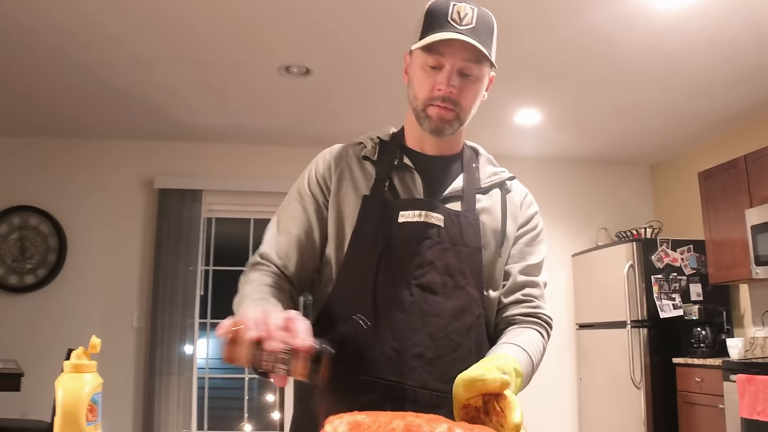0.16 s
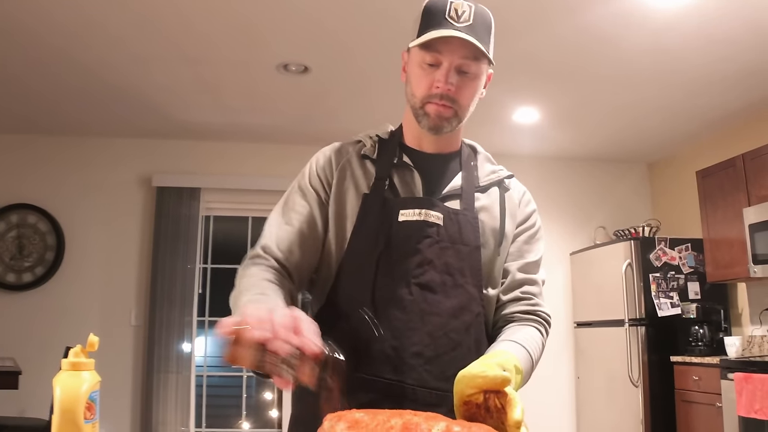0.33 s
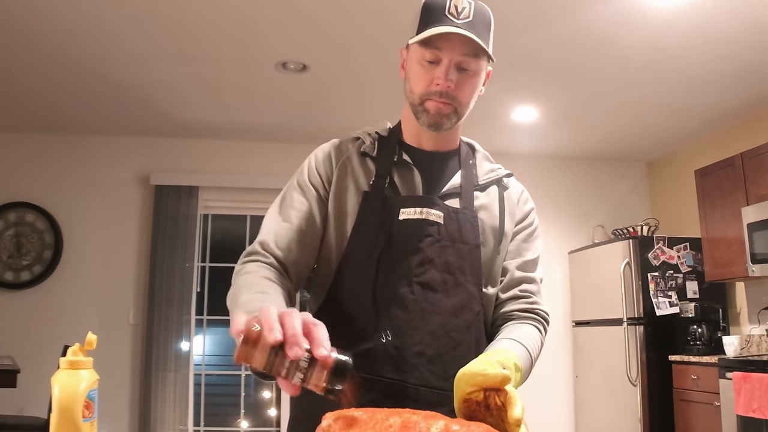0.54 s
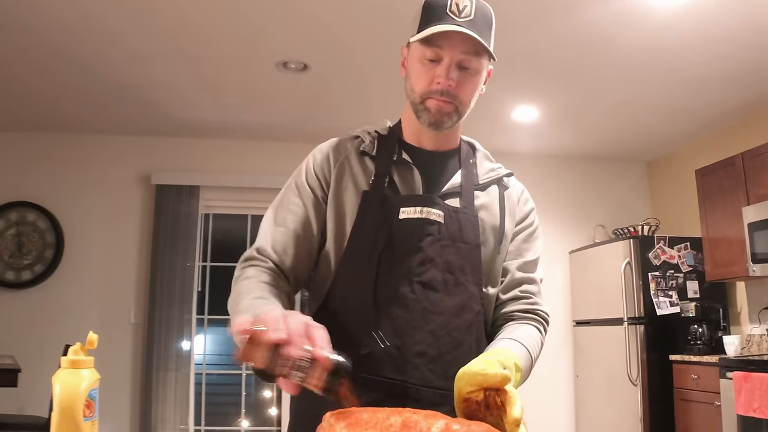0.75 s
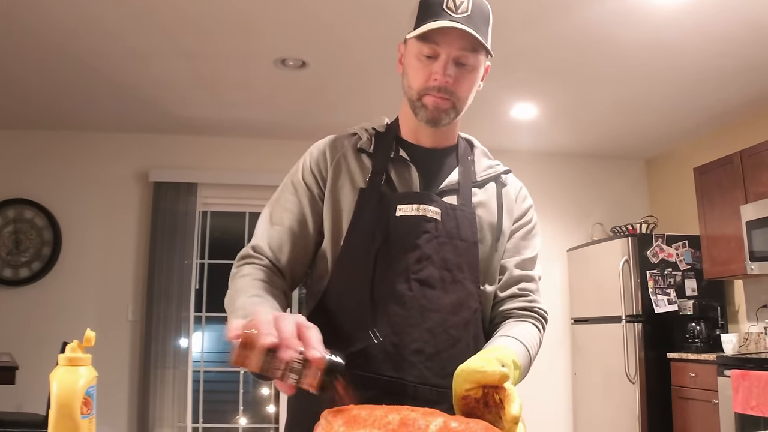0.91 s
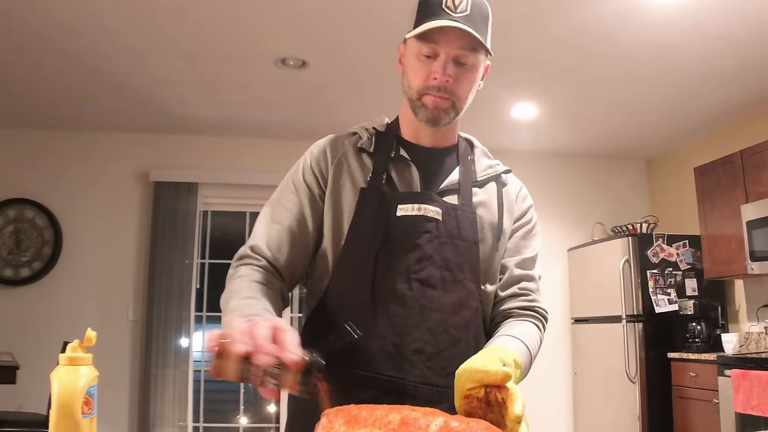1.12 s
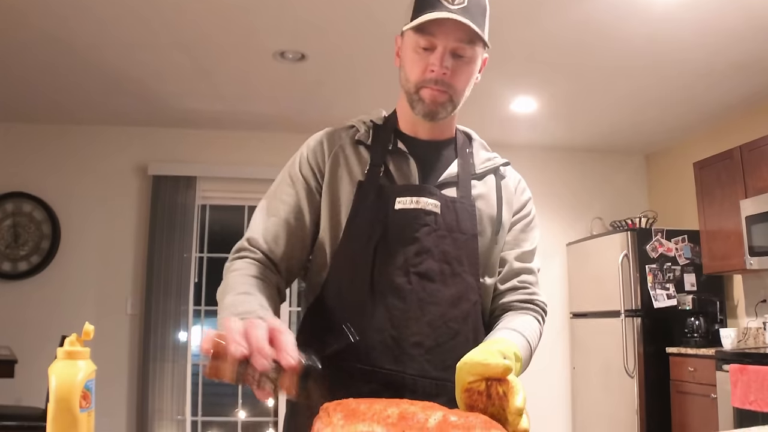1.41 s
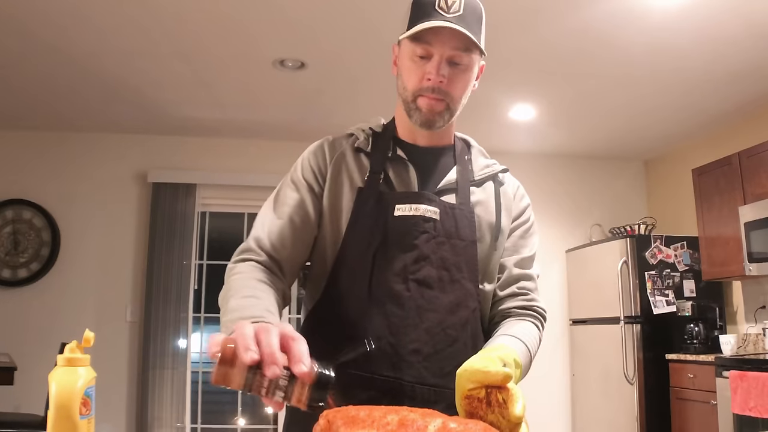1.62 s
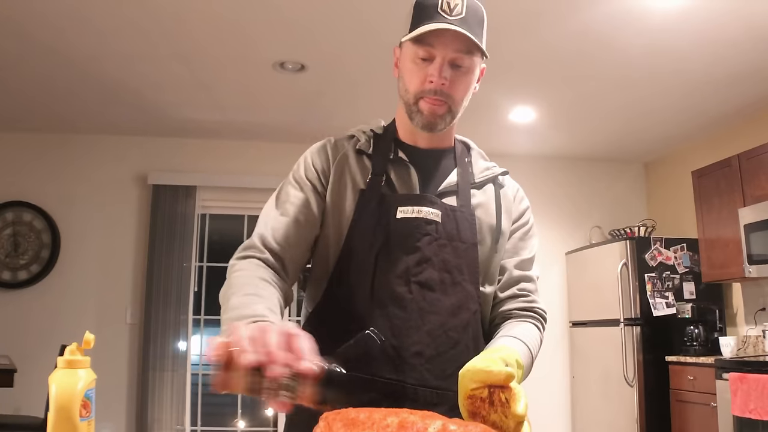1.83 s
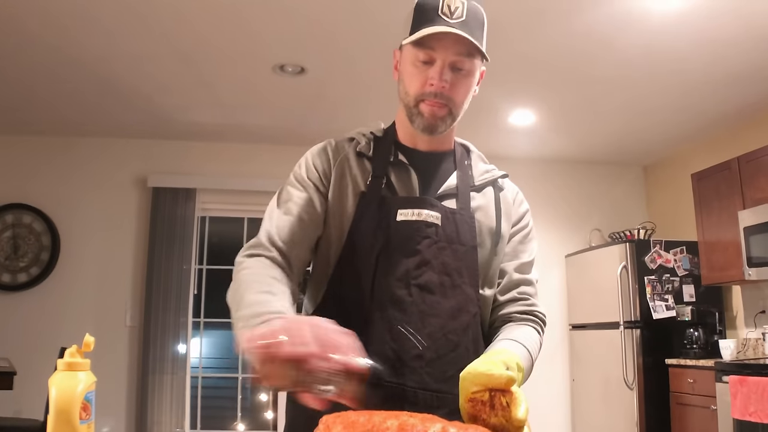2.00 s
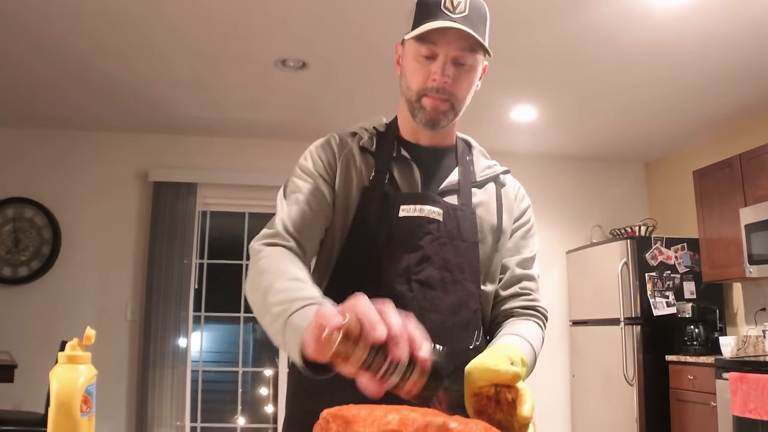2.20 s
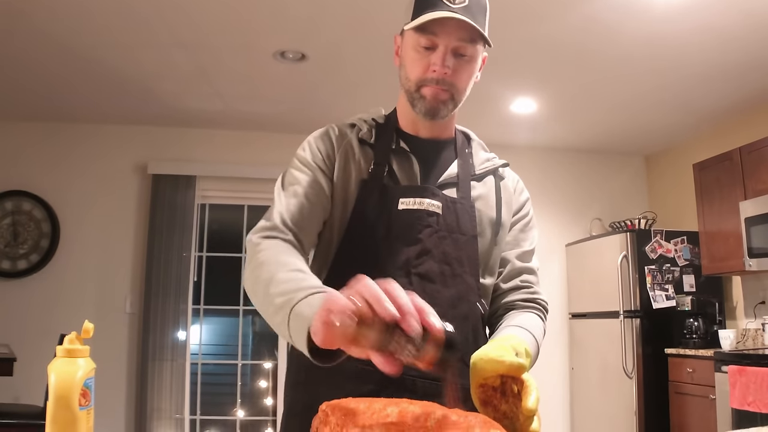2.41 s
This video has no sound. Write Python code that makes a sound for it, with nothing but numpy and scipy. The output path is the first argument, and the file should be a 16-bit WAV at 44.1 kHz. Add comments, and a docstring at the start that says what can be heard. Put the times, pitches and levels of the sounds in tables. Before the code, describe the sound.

A plastic bottle of dry seasoning is shaken quickly and steadily, each shake a short grainy hiss with small ticks and rattles, over fine patter on meat, close to the microphone in a quiet kitchen.

```python
"""A plastic bottle of dry seasoning is shaken fast over meat in a quiet kitchen.
At each turn the grains slide and strike the wall: thousands of tiny clicks ring short resonators.
Clumps tick (noise bursts) and rattle (wall modes), the load thuds softly, a fine patter falls throughout.
Below: faint room noise, appliance hum, a faint tone that comes and goes, dull bumps through the counter,
and a very deep rumble of the shaking carried to the microphone, made of shaped noise."""
import sys
import numpy as np
from scipy import signal
from scipy.fft import rfft, irfft
from scipy.io import wavfile

SR = 44100
rng = np.random.default_rng(int(sys.argv[2]) if len(sys.argv) > 2 else 0)


def store_wav(level_fs):
    """Save 16-bit WAV to argv[1]."""
    pcm = np.round(np.clip(np.atleast_2d(level_fs), -1, 1) * 32767)
    wavfile.write(sys.argv[1], SR, pcm.T.astype(np.int16))


N = 112454


def amp(db):
    """Turn decibels into a plain factor."""
    return 10 ** (np.asarray(db) / 20)


def rms_one(x):
    """Scale a sound to an rms (average strength) of 1."""
    return x / np.sqrt(np.mean(x ** 2) + 1e-30)


def in_time(rows):
    """Draw straight lines between (time, level) points, one value per sample."""
    times, levels = np.transpose(rows)
    return np.interp(np.arange(N) / SR, times, levels)


def at_hz(points, hz):
    """Read a (frequency, level) curve at hz, on a logarithmic frequency scale."""
    freqs, levels = np.transpose(points)
    return np.interp(np.log(hz), np.log(freqs), levels)


def coloured_noise(points):
    """Steady noise with the given spectrum; rms 1."""
    hz = np.maximum(np.arange(N // 2 + 1) * SR / N, 1)
    spectrum = rfft(rng.standard_normal(N)) * amp(at_hz(points, hz))
    return rms_one(irfft(spectrum, N))


def drift(rate):
    """Smooth random wandering, mostly slower than rate in Hz; rms 1."""
    r = np.exp(-2 * np.pi * rate / SR)
    noise = rng.standard_normal(N + SR)
    # the first second lets the filter settle
    return rms_one(signal.lfilter([1], [1, -2 * r, r * r], noise)[SR:])


def ring(clicks, hz, t60):
    """A unit click sets a sine of height about 1 ringing; it drops 60 dB in t60 seconds."""
    r, w = amp(-60 / (t60 * SR)), 2 * np.pi * hz / SR
    return signal.lfilter([0, np.sin(w)], [1, -2 * r * np.cos(w), r * r], clicks + 1e-18)


def room_noise():
    """Faint steady room noise, shaped by a spectrum curve."""
    # spectrum of the room: f/Hz, relative level per Hz/dB
    room_colour = [(41, -23.5), (70, -6.5), (103, -11), (148, 2), (203, -5.5), (291, -4.5), (735, -12),
                   (1420, -33), (1780, -51), (4290, -21.5), (8640, -28), (11100, -34.5), (15600, -23)]
    room_db = -76.5
    return amp(room_db) * coloured_noise(room_colour)


def hum():
    """Wavering appliance tones: noise in narrow resonances."""
    # the tones: f/Hz, width/Hz, level/dB
    hum_tones = [(160, 15, -85), (281, 15, -89), (473, 4, -91)]
    out = np.zeros(N)
    for hz, width, db in hum_tones:
        out += amp(db) * rms_one(ring(rng.standard_normal(N), hz, 2.28 / width))
    return out


def whine():
    """A faint tone that comes and goes: noise in one narrow resonance, on its own level curve."""
    # strength of the tone: t/s, level/dB
    whine_level = [(0, -93), (.35, -85.5), (.6, -99), (1.15, -99), (1.25, -85), (1.65, -83.5),
                   (1.75, -102.5), (2.55, -87.5)]
    whine_hz, width_hz = 1087, 81
    tone = rms_one(ring(rng.standard_normal(N), whine_hz, 2.2 / width_hz))
    return amp(in_time(whine_level)) * tone


def rumble():
    """The shaking carried to the microphone: very deep noise that swells and sinks."""
    # spectrum of the rumble: f/Hz, relative level per Hz/dB
    rumble_colour = [(2, -8), (6, 2), (10, -2), (15, 0), (19, -1), (23, -8), (27, -15), (33, -27),
                     (45, -45), (70, -63)]
    # strength of the rumble: t/s, level/dB
    rumble_level = [(0.0, -44.5), (0.4, -45.5), (0.9, -45.5), (1.05, -49.5), (1.19, -44), (1.3, -53),
                    (1.5, -45), (1.95, -43.5), (2.1, -47.5), (2.55, -48.5)]
    return amp(in_time(rumble_level)) * coloured_noise(rumble_colour)


def thrum():
    """A low thrum above the rumble: deep noise on a level curve."""
    # spectrum of the thrum: f/Hz, relative level per Hz/dB
    thrum_colour = [(30, -22.5), (41, -8), (47, 3.5), (53, -5.5), (62, -11), (85, -26), (110, -21.5),
                    (150, -56.5)]
    # strength of the thrum: t/s, level/dB
    thrum_level = [(0.03, -76), (0.26, -72.5), (0.53, -68), (0.57, -67), (0.62, -70), (0.67, -83),
                   (0.74, -74), (0.8, -69), (1.05, -68.5), (1.15, -71.5), (1.3, -70), (1.45, -70),
                   (1.65, -74.5), (1.9, -66.5), (2.1, -66.5), (2.25, -63.5), (2.52, -74)]
    return amp(in_time(thrum_level)) * coloured_noise(thrum_colour)


def bumps():
    """Dull bumps through the counter: each is a softened, quickly damped low swing."""
    # bumps: t/s, peak level before softening/dB, f/Hz
    bump_rows = [(0.247, -61, 45.3), (0.559, -45, 49.7), (0.793, -57, 53.6), (1.032, -57, 49.4),
                 (1.265, -75, 65), (2.432, -57.5, 94)]
    t60_s, soft_hz = 0.11, 163
    out = np.zeros(N)
    for s, db, hz in bump_rows:
        knock = 1.0 * (np.arange(N) == int(s * SR))
        out += amp(db) * ring(knock, hz, t60_s)
    return signal.sosfilt(signal.butter(1, soft_hz, fs=SR, output="sos"), out)


def kitchen(x):
    """Echoes of the room: the sound is smeared by a decaying noise tail of energy 1."""
    t60_s = 0.2
    n = np.arange(int(.4 * SR)) / SR
    # the tail waits 4 ms
    tail = rng.standard_normal(len(n)) * amp(-60 * n / t60_s) * (n > .004)
    return signal.fftconvolve(x, tail / np.sqrt(np.sum(tail ** 2)))[:N]


def grains(gain_at):
    """Dense uneven clicks dealt to short resonators spread in pitch; gain_at(hz) gives each its envelope."""
    grains_per_s, size_spread_db = 13000, 2.7
    clump_db, clump_hz = 1.6, 350   # how strongly and how fast the stream bunches
    ring_cycles = 22   # each resonator drops 60 dB in this many swings
    sizes = amp(size_spread_db * np.minimum(rng.exponential(1, N), 3.5))
    sizes = sizes * rng.choice([-1, 1], N)
    hits = rng.random(N) < grains_per_s / SR
    clicks = sizes * hits * amp(clump_db * drift(clump_hz))
    pitches, dealt = np.geomspace(700, 16000, 56), rng.integers(0, 56, N)
    out = np.zeros(N)
    for k, hz in enumerate(pitches):
        voice = rms_one(ring(clicks * (dealt == k), hz, ring_cycles / hz))
        # higher resonators cover a wider band: this evens out the power per Hz
        out += gain_at(hz) * np.sqrt(hz / 1.1e5) * voice
    return out


def patter():
    """Fine grains keep landing throughout, on a level curve of their own."""
    # strength of the landing grains before colour: t/s, level/dB
    patter_level = [(0, -67), (.4, -70.5), (.76, -65.5), (1.0, -70.5), (1.2, -70.5), (1.4, -68), (1.7, -73),
                    (2.0, -73), (2.26, -65.5), (2.3, -73), (2.42, -71), (2.45, -84), (2.55, -77)]
    # colour of the patter: f/Hz, level/dB
    patter_colour = [(900, -14), (1850, -10), (2800, -12.5), (4500, -14.5), (6000, -8), (7600, -10),
                     (8700, -6), (10200, -21.5), (15600, -28)]
    level = amp(in_time(patter_level))
    return grains(lambda hz: level * amp(at_hz(patter_colour, hz)))


def thuds():
    """The load lands in the bottle: each landing is about one soft swing of the wall."""
    # landings: t of the peak/s, peak level/dB, f/Hz
    thud_rows = [(0.1859, -62, 217), (0.2605, -59.5, 367), (0.3417, -57.5, 253), (0.3633, -58, 533),
                 (0.522, -59.5, 253), (0.5915, -59, 277), (0.6664, -61.5, 307), (0.7616, -52.5, 343),
                 (0.8158, -61.5, 218), (0.942, -58.5, 330), (1.066, -69, 282), (1.2368, -59.5, 276),
                 (1.32, -57.5, 278), (1.3994, -58, 310), (1.5698, -55.5, 307), (1.8616, -57.5, 337),
                 (1.9045, -62, 495), (2.017, -56.5, 332), (2.1745, -63, 300.0), (2.2392, -62, 275)]
    half_width_cycles = .46
    out, n = np.zeros(N), np.arange(-600, 600)
    phases = rng.uniform(0, 2 * np.pi, len(thud_rows))
    for (s, db, hz), phase in zip(thud_rows, phases):
        cycles = hz * n / SR
        swing = np.cos(2 * np.pi * cycles + phase)
        out[int(s * SR) + n] += amp(db) * swing * np.exp(-(cycles / half_width_cycles) ** 2)
    return out


def ticks():
    """Clumps tick on the wall: a very short noise burst in three bands, and a brief ring of the wall."""
    # ticks: t/s, wall f/Hz, about peak level of wall ring/dB, peak level of low, mid, top crack/dB
    tick_rows = [(0.106, 2430, -78, -54, -53, -70), (0.181, 2860, -65, -75, -73, -69),
                 (0.1945, 1700.0, -67, -54, -69, -72), (0.2272, 2030.0, -97, -66, -57, -52.5),
                 (0.4712, 2720, -69, -63, -64, -65), (0.4989, 1640, -68, -70, -66, -80),
                 (0.5137, 1390, -100, -74, -69, -55), (0.543, 1730, -64, -57, -51, -60),
                 (0.6538, 1910, -63, -68, -82, -70), (0.809, 1730, -58.5, -77, -70, -69),
                 (0.8172, 2000.0, -63, -72, -72, -73), (0.8406, 1540.0, -69, -57, -53, -66),
                 (0.992, 1830, -59.5, -53.5, -46, -71), (0.9966, 1370, -87, -78, -59, -78),
                 (1.0492, 1930, -64, -58, -68, -75), (1.0563, 1830.0, -66, -78, -52, -84),
                 (1.0953, 2120, -74, -70, -55, -54), (1.3245, 2340, -57.5, -81, -81, -83),
                 (1.415, 2300, -85, -60, -77, -56), (1.4895, 1960, -59, -57, -61, -68),
                 (1.5863, 1900, -63, -55.5, -62, -64), (1.6125, 1910, -74, -49.5, -59, -58),
                 (1.6599, 2000, -67, -55, -51, -63), (1.6707, 2160.0, -57, -67, -79, -70),
                 (1.6736, 2330, -55, -54, -53, -58), (1.694, 2240, -82, -72, -71, -81),
                 (1.729, 2600, -70.5, -55, -76, -74), (1.776, 1880, -76, -69, -58.5, -72),
                 (1.8417, 1880, -64, -66, -62, -71), (1.866, 1580.0, -74, -58, -80, -87),
                 (1.8941, 1580, -88, -76, -65, -56), (1.9019, 1890, -70, -55.5, -47.5, -50.5),
                 (1.9827, 1930, -65, -79, -78, -82), (2.0592, 1700, -88, -78, -73, -51),
                 (2.1424, 2080, -88, -76, -55.5, -73), (2.1902, 2150, -71.5, -75, -65, -70),
                 (2.2665, 1720, -61, -58, -72, -73), (2.3045, 1860, -74, -64.5, -73, -70),
                 (2.3475, 2160, -77, -73, -76, -88), (2.4062, 1910, -86, -76, -61, -70),
                 (2.4323, 1810, -74, -77, -77, -82), (2.505, 1640.0, -79, -81, -68, -70)]
    # the three crack bands: lower f/Hz, upper f/Hz
    crack_bands = [(2800, 5500), (5500, 9500), (9500, 15500)]
    wall_t60_s, crack_s = .009, .0005
    out, n = np.zeros(N + SR), np.arange(800) / SR
    filters = [signal.butter(2, edges, "band", fs=SR, output="sos") for edges in crack_bands]
    noises = rng.standard_normal((len(tick_rows), 800))
    for (s, hz, wall_db, *crack_db), noise in zip(tick_rows, noises):
        burst = noise * np.exp(-n / crack_s)
        # the wall ring swells in softly; the 2 makes up for the height lost
        wall_shape = amp(-60 * n / wall_t60_s) * (1 - np.exp(-n / crack_s)) * 2
        tick = amp(wall_db) * np.sin(2 * np.pi * hz * n) * wall_shape
        for sos, band_db in zip(filters, crack_db):
            part = signal.sosfilt(sos, burst)
            tick = tick + amp(band_db) * part / np.abs(part).max()
        i = int(s * SR)
        out[i:i + 800] += tick
    return out[:N]


def rattles():
    """Coarse bits rattle: uneven knocks strike every wall mode with a strength of its own."""
    # rattles: start t/s, length/s, level/dB
    rattle_rows = [(0.105, .025, -82), (0.687, .03, -83), (0.809, .02, -84), (1.321, .02, -78.5),
                   (1.414, .03, -81), (1.495, 0.026, -75), (1.52, 0.034, -81), (1.678, 0.014, -67.5),
                   (1.695, .035, -82), (1.745, .03, -92), (2.268, .015, -83)]
    # ways the bottle wall rings: f/Hz, relative level/dB, time to drop 60 dB/s
    wall_modes = [(734, -1, 0.027), (1125, -3.5, 0.033), (1410, -4, .025), (1840, 2.5, 0.015),
                  (2160, -1.5, 0.027), (2385, -3.5, 0.038), (2800, 4, 0.01), (3370, -3, .02),
                  (3820, -8.5, 0.025)]
    knocks_per_s, spread_db = 1000, 3
    t, level = np.arange(N) / SR, np.zeros(N)
    for s, length, db in rattle_rows:
        level += amp(db) * ((t >= s) & (t < s + length))
    knocks = (rng.random(N) < knocks_per_s / SR) * amp(spread_db * rng.standard_normal(N))

    def strike(hits):
        return sum(amp(db) * ring(hits * rng.standard_normal(N), hz, t60) for hz, db, t60 in wall_modes)
    # a nonstop rattle sets the scale, so the listed levels are strengths while rattling
    scale = 1 / np.std(strike(knocks))
    return scale * strike(knocks * level)


def shakes():
    """Slides swell, hold and die; crashes start at once and decay; colour leans on body, hiss or top."""
    # grains slide at each turn of the hand; levels before the bottle's colour:
    # start t/s, length/s, level of bottle body/dB, of grain hiss/dB, of top/dB
    slides = [(0, 0.052, -86, -75, -82), (0.091, 0.056, -78.5, -74, -79), (0.185, 0.031, -81, -76, -79),
              (.265, 0.055, -90, -77, -81), (0.348, 0.037, -78, -72, -72), (0.423, 0.05, -84, -71, -81),
              (.51, 0.043, -83.5, -74, -78), (0.582, 0.055, -101, -73, -82),
              (.681, 0.039, -80.5, -72, -71.5), (0.758, 0.068, -80, -71.5, -77.5),
              (0.843, 0.06, -83, -73, -76), (0.938, 0.078, -78.5, -76, -79), (1.042, 0.067, -81, -75, -81),
              (1.129, 0.049, -91, -74.5, -96), (1.241, 0.045, -82, -81.5, -79.5),
              (1.296, 0.07, -85, -81.5, -80), (1.398, 0.041, -75, -74, -78.5),
              (1.495, 0.04, -80, -70.5, -77), (1.596, 0.031, -83, -67, -95), (1.646, 0.057, -78, -74, -90),
              (1.711, .06, -76, -81, -97), (1.797, 0.017, -80.5, -72.5, -80),
              (1.881, 0.034, -79, -74.5, -88), (1.928, 0.047, -86, -72.5, -83),
              (2.027, 0.046, -102, -82, -73), (2.08, 0.038, -108.5, -74, -88), (2.128, .035, -78, -80, -83),
              (2.181, 0.034, -81, -74, -81), (2.226, 0.056, -79.5, -76.5, -81),
              (2.327, 0.028, -80, -90, -100), (2.374, 0.092, -88, -100, -92),
              (2.494, 0.041, -80, -78.5, -80)]
    # a whole handful hits the wall and scatters; levels before the bottle's colour:
    # t/s, decay/s, level of body/dB, of hiss/dB, of top/dB
    crash_rows = [(0.1054, 0.0086, -72, -59, -85), (1.325, 0.01, -75, -99, -99),
                  (1.504, 0.012, -76, -77, -102), (1.5852, 0.0056, -68, -64, -72),
                  (1.672, 0.011, -71.5, -59, -91), (1.9005, 0.0044, -80, -62, -96)]
    # colour of the bottle: f/Hz, level/dB
    bottle_colour = [(700, -34), (950, -3.5), (1070, 4.5), (1350, -8), (1600, -1.5), (1850, 5.5),
                     (2300, -7), (2800, -3), (3400, 4), (4500, -7), (5400, 4), (6300, 2.5), (7700, -1),
                     (8600, 8), (9400, 4.5), (10200, -2.5), (12000, -3.5), (15600, -5.5)]
    rise_share, fall_s = 0.32, 0.0078   # swell as a share of the slide's length; dying away
    body_hz, top_hz = 2000, 13700
    slide_hiss_hz, crash_hiss_hz = 6480, 4900   # a crash hisses lower than a slide
    slides, crashes = np.array(slides), np.array(crash_rows)
    t = np.arange(N) / SR
    coarse_t = t[::16]   # envelopes change slowly, so every 16th sample will do

    since_start = coarse_t - slides[:, :1]
    length = slides[:, 1:2]
    # the swell has reached 0.31 at the listed start
    swell = np.clip(since_start / (rise_share * length) + 0.31, 0, 1)
    fall = np.exp(-np.maximum(since_start - length + fall_s / 2, 0) / fall_s)
    since_crash = coarse_t - crashes[:, :1]
    burst = (since_crash >= 0) * np.exp(-np.maximum(since_crash, 0) / crashes[:, 1:2])
    shape = np.vstack([swell * fall, burst])

    # spread each level over the width of its band
    width_hz = np.array([2300, 6000, 5000])
    density = np.vstack([slides, crashes])[:, 2:] - 10 * np.log10(width_hz / 6000)
    hiss_centres = [slide_hiss_hz] * len(slides) + [crash_hiss_hz] * len(crashes)

    def gain_at(hz):
        db = [at_hz(list(zip([body_hz, hiss_hz, top_hz], row)), hz)
              for row, hiss_hz in zip(density, hiss_centres)]
        envelope = np.interp(t, coarse_t, amp(db) @ shape)
        return envelope * amp(at_hz(bottle_colour, hz))
    return grains(gain_at)


def scene():
    """Mix the bottle, its echoes, the patter and the background."""
    wet_db = -9.5   # level of the echoes
    bottle = shakes() + rattles() + ticks() + thuds()
    room = room_noise() + hum() + whine()
    deep = rumble() + thrum() + bumps()
    return (bottle + amp(wet_db) * kitchen(bottle) + patter() + room + deep)[None]


def record(dry):
    """The top is cut: a steep filter holds everything above stop_hz at least 40 dB down."""
    stop_hz = 15824
    return signal.sosfilt(signal.cheby2(24, 40, stop_hz, fs=SR, output="sos"), dry)


dry = scene()
out = record(dry)
store_wav(out)
```